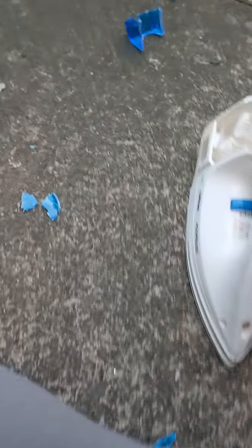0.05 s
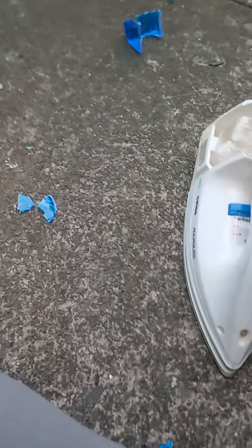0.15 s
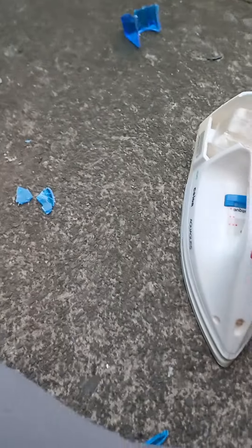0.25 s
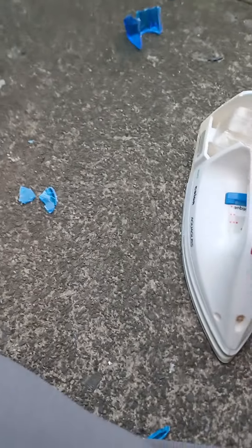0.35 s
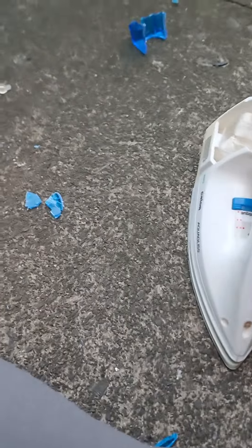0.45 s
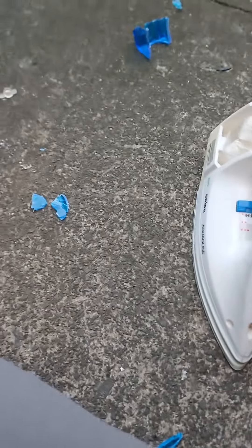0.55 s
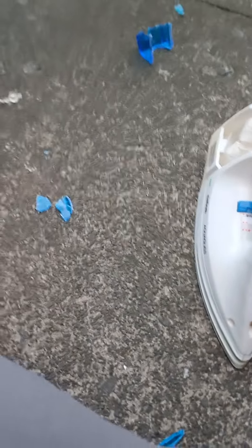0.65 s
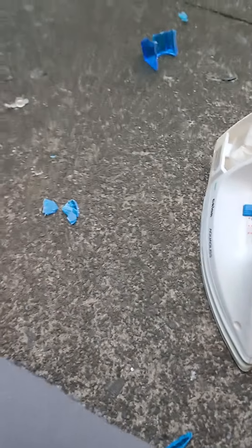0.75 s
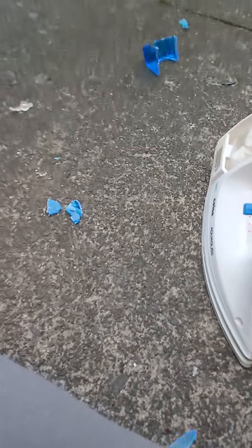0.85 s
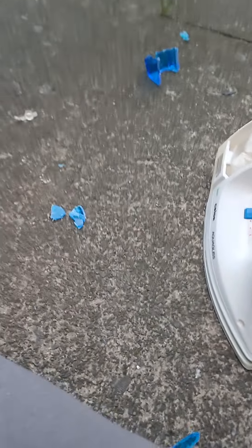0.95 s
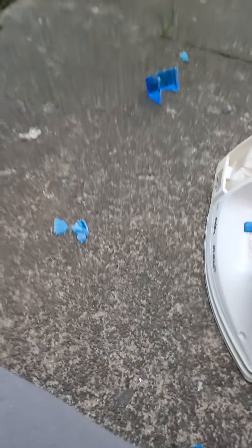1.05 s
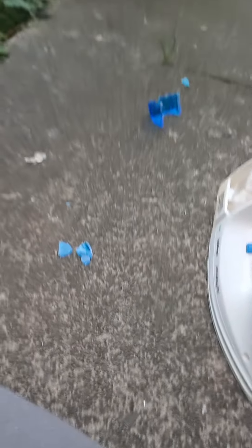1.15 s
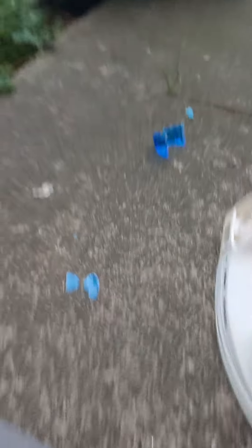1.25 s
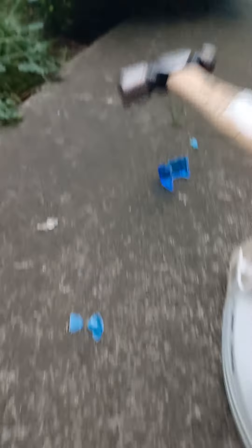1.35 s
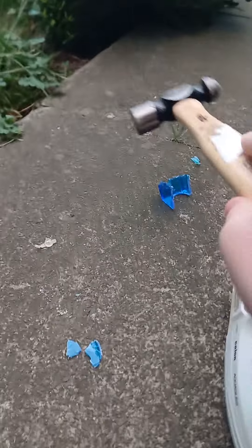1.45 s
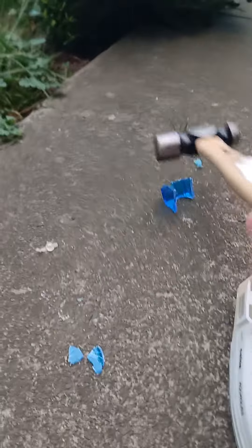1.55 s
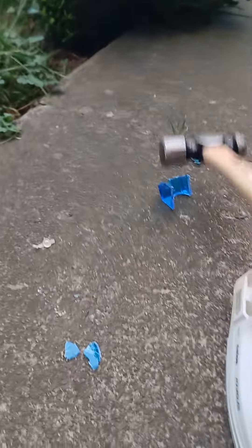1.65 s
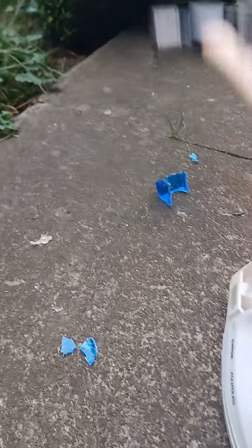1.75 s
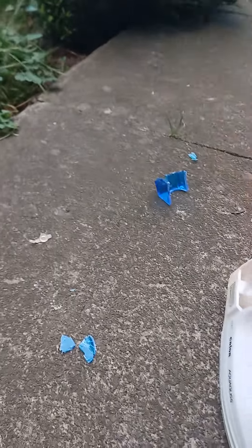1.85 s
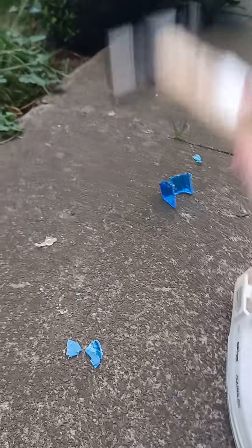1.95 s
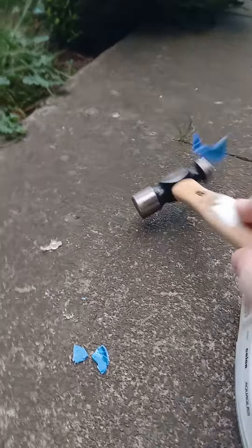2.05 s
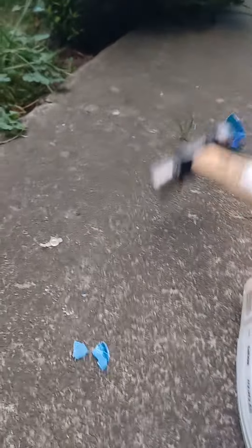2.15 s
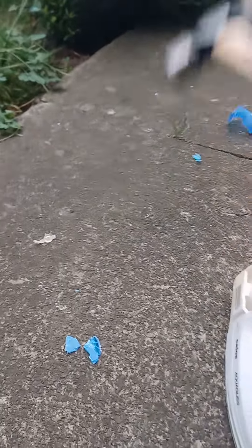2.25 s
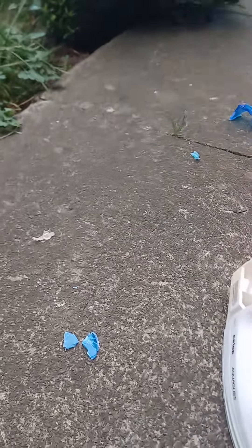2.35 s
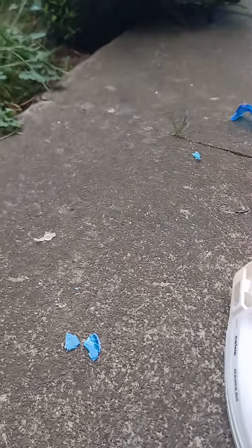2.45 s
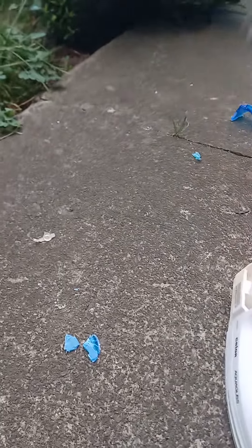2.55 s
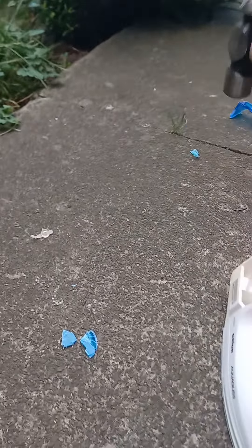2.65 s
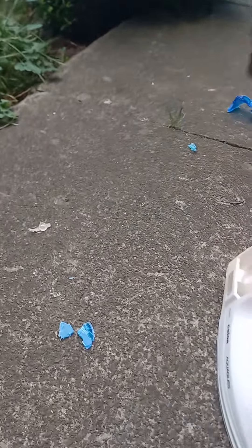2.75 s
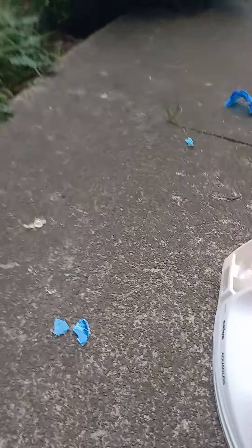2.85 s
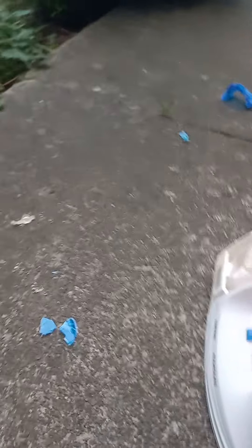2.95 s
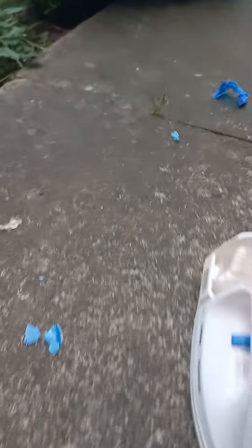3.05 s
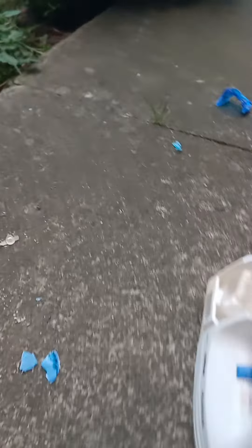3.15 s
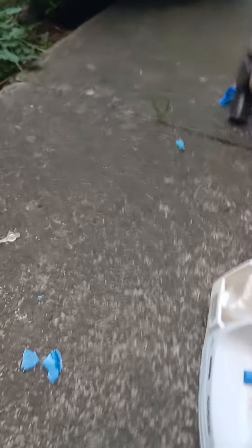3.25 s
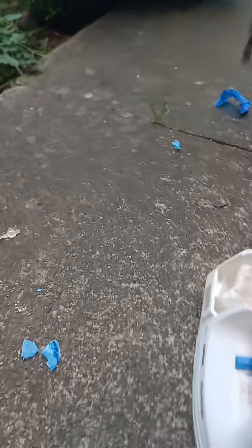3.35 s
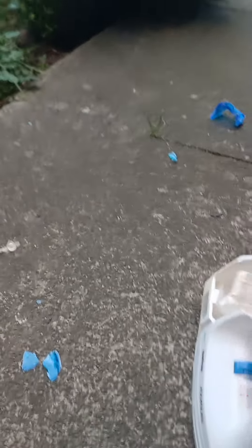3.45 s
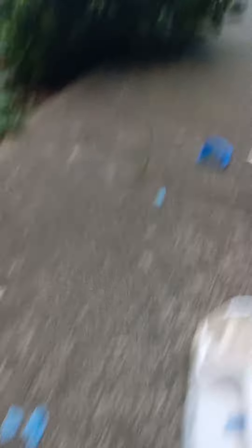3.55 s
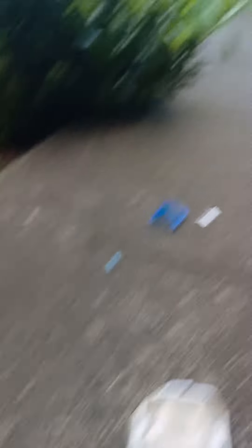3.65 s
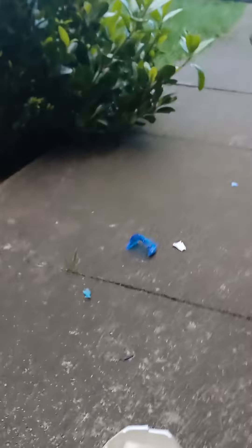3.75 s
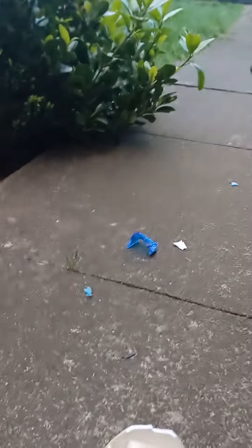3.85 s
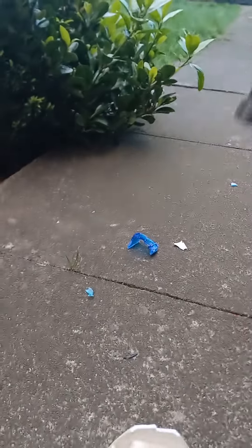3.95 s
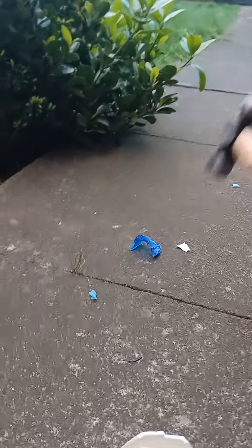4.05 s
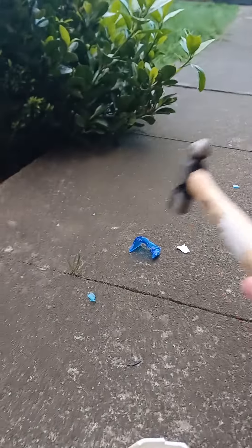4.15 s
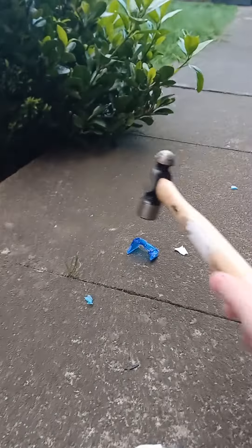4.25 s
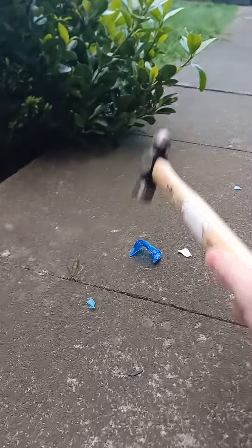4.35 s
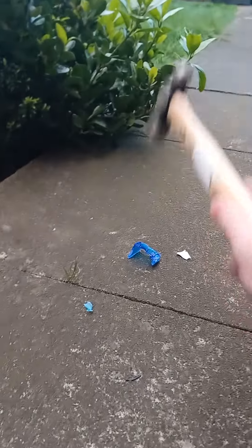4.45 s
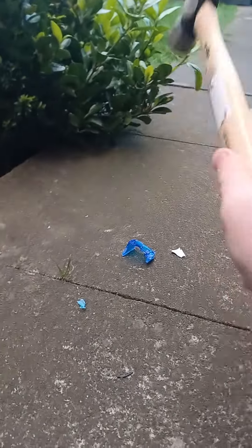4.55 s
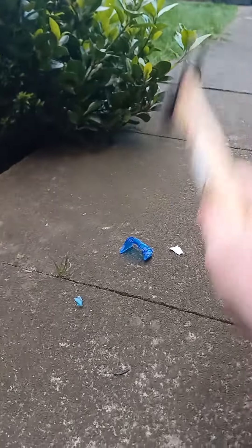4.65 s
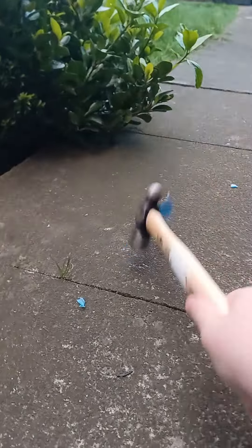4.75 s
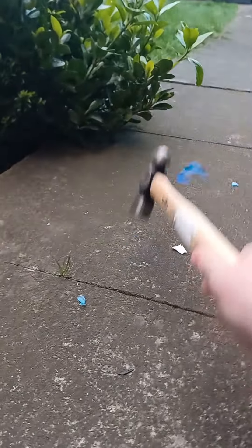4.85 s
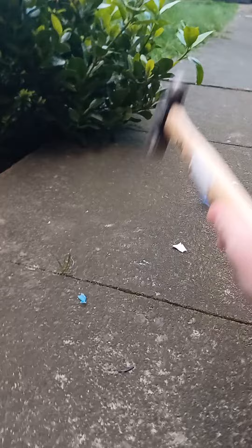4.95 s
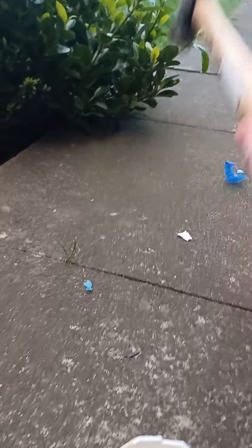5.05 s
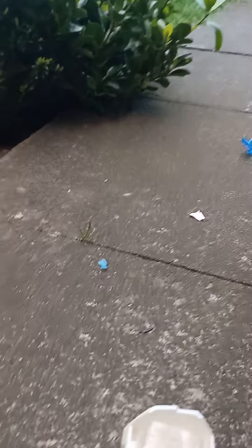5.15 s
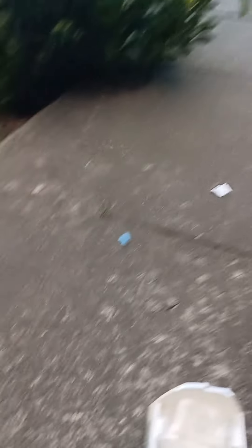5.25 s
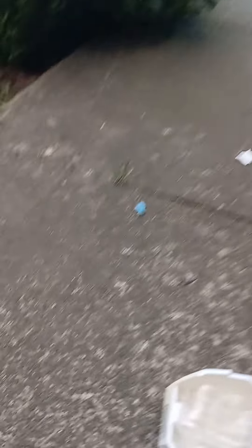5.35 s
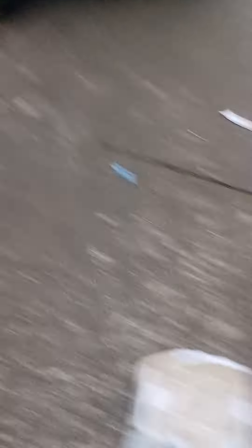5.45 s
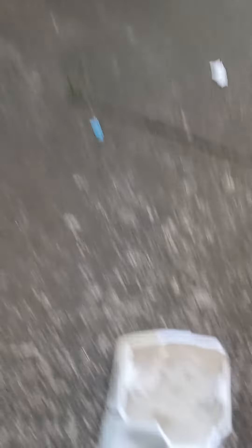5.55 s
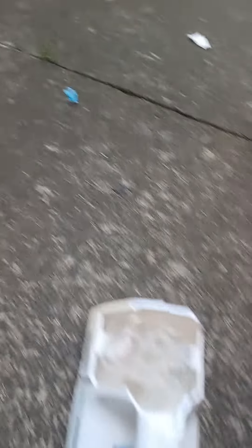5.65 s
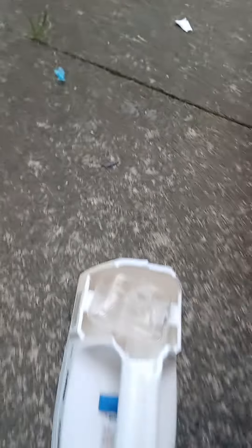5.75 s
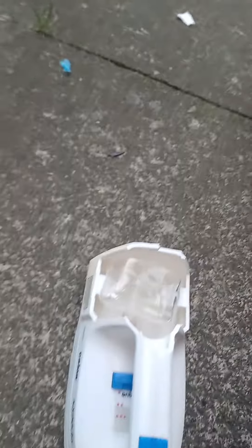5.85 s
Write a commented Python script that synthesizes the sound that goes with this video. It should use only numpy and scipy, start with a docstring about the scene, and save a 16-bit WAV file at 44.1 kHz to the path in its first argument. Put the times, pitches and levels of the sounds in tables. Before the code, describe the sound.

A steel hammer hits brittle plastic on concrete, five separated strikes in about six seconds, heard close by a phone outdoors. The first is a quick muffled crackle, the later ones louder and sharper. Pieces skip and rattle in bright, thin ticks between them. There is a short fluttering slap from nearby walls, a little cloth swish, and a faint far-off town rumble.

```python
"""A hammer smashes a small hard plastic toy on a concrete path beside a house, close to a hand-held phone.
Cracks are short bursts of uneven noise; the steel head, the toy and a shard ring as sets of fading tones.
Each blow also pushes out a low wave, and the walls return echoes, a soft tail and a low flutter.
Between the swings, shaped noise makes a sleeve swish and a shoe scuff.
The far town is a noise rumble with tyre wash at a level set over time, and one wavering drone swells in it."""
import sys
import numpy as np
from scipy import signal
from scipy.fft import rfft, irfft
from scipy.io import wavfile
from scipy.ndimage import uniform_filter1d

SR = 44100
rng = np.random.default_rng(int(sys.argv[2]) if len(sys.argv) > 2 else 0)


def output_pcm(signal):
    """Save a mono or channel-first signal as 16-bit PCM at the path in sys.argv[1].

    Samples are clipped to [-1, 1] before scaling.
    """
    pcm = np.clip(np.atleast_2d(signal).T, -1, 1) * 32767
    wavfile.write(sys.argv[1], SR, np.round(pcm).astype(np.int16))


N = 260190
TIME = np.arange(N) / SR  # seconds


def amp(db):
    """Turn decibels into a plain multiplier."""
    return 10 ** (np.asarray(db) / 20)


def curve(rows, column=1):
    """A table column joined by straight lines in time."""
    rows = np.array(rows)
    return np.interp(TIME, rows[:, 0], rows[:, column])


def unit(x):
    """Scale a sound to an average (RMS) level of 1."""
    return x / np.sqrt(np.mean(x ** 2))


def colour(x, points):
    """Make some pitches stronger and others weaker, following (f/Hz, level/dB) points."""
    hz, db = np.transpose(points)
    bins_hz = np.fft.rfftfreq(x.shape[-1], 1 / SR) + 1  # the 1 avoids the log of zero
    gains = amp(np.interp(np.log(bins_hz), np.log(hz), db))
    return irfft(rfft(x) * gains, x.shape[-1])


def cut(x, hz, kind="low", order=2):
    """Butterworth filter: keep what lies below hz ("low"), above it ("high") or between two ("band")."""
    sections = signal.butter(order, hz, kind, fs=SR, output="sos")
    return signal.sosfilt(sections, x)


def stereo_noise(size, width):
    """Noise at two microphones; width 0 is alike, 1 unrelated."""
    mid, side = rng.standard_normal((2, size))
    return np.array([mid + width * side, mid - width * side]) / np.sqrt(1 + width ** 2)


def pan_gains(pan_db):
    """Left and right multipliers that differ by pan_db (left minus right)."""
    return amp(np.array([[pan_db], [-pan_db]]) / 2)


def add(out, s, sound, pan_db):
    """Mix a stereo sound in at s seconds, towards one side."""
    start = int(s * SR)
    part = sound[:, :N - start] * pan_gains(pan_db)
    out[:, start:start + part.shape[1]] += part


def swell(s, hold_s, rise_s, release_s):
    """A rise that ends at s, a hold and a release, with rounded corners."""
    before = np.maximum(s - TIME, 0) / rise_s
    after = np.maximum(TIME - s - hold_s, 0) / release_s
    return 1 / np.cosh(np.minimum(2 * (before + after), 20))


def ring(modes, gains_db, scatter_db, apart_hz):
    """A struck body's fading tones, freshly weighted; short waves reach the two microphones out of step."""
    hz, db, t60 = np.transpose(modes)[:, :, None]
    t = TIME[:SR // 2]
    scatter = scatter_db * rng.standard_normal((2, len(hz), 1))
    size = amp(db + np.reshape(gains_db, (-1, 1)) + scatter)
    phase = np.minimum(hz / apart_hz, 1) * np.pi / 4 * rng.choice([-1, 1], hz.shape)
    # complex waves carry pitch and fade together; the imaginary part is what sounds
    waves = np.exp((2j * np.pi * hz - np.log(1000) / t60) * t)
    weights = size * np.exp(1j * np.array([phase, -phase]))
    return (weights[:, :, 0] @ waves).imag


def favour(modes, hz, boost_db, octaves):
    """The point of contact drives the modes near one pitch hardest (dB per mode)."""
    distance = np.log2(np.array(modes)[:, 0] / hz) / octaves
    return boost_db * np.exp(-distance ** 2)


# basic tone of a fracture, before its treble tilt: f/Hz, level/dB
FRACTURE_COLOUR = [(40, -29.5), (170, 2.5), (500, -2.5), (1000, 0), (1600, 3), (2700, -2.5), (4600, 0.5),
                   (7500, -6.5), (9500, -7.5), (13000, -5), (15500, -3.5)]


def snap(length, tilt_db, spread_db=8.0, fade_s=0.003):
    """A burst of tiny fractures, uneven in size, dying quickly in the plastic."""
    lead = 128  # silent samples at the start, trimmed off after the colouring
    t = TIME[:4096] - lead / SR
    grains = amp(spread_db * np.repeat(rng.standard_normal(256), 16))  # a new size every 16 samples
    fade = np.exp(-np.maximum(t - length, 0) / fade_s)
    noise = stereo_noise(len(t), 1) * (t > 0) * fade * grains
    # the tilt is in dB per octave and turns around 4000 Hz
    tilted = [(hz, db + tilt_db * np.log2(hz / 4000)) for hz, db in FRACTURE_COLOUR]
    burst = colour(noise, tilted)[:, lead:3072]
    # even out the energy so that long and short bursts are comparably strong
    return burst / np.sqrt(np.sum(burst ** 2) / (2 * SR * (length + fade_s / 2)))


def tick(peak_hz, q=1.4, tilt_db=-0.5):
    """The click of a hard edge on concrete, brightest around one pitch."""
    click = np.zeros((2, SR // 2))
    add(click, 0, cut(snap(0.00091, tilt_db, fade_s=0.0015), 1900, "high"), 0)
    return signal.lfilter(*signal.iirpeak(peak_hz, q, fs=SR), click)


# tone of the background noise: f/Hz, level/dB
BACKGROUND_COLOUR = [(15, -54.5), (25, -22.5), (35, -26), (48, 0.5), (114, 2), (177, -5.5), (260, -1.5),
                     (364, -10.5), (475, -17), (523, -19.5), (1000, -15.5), (2070, -30.5), (2510, -46.5),
                     (5440, -64), (8000, -58.5), (10400, -86.5), (17600, -120)]
# background level over time, dipping after the first blow as the phone turns itself down;
# before the trims below: t/s, rumble level/dB, tyre noise level/dB
BACKGROUND_LEVELS = [(0.0, -53.5, -61), (0.76, -59.5, -64.5), (2.0, -50.5, -53.5), (2.46, -52, -57),
                     (3.27, -44.5, -51), (4.01, -54.5, -56.5), (5.65, -52, -53), (5.9, -50, -49.5)]


def town(rumble_trim_db=3.0, tyres_trim_db=-3.0, split_hz=500, pan_db=-3):
    """The distant town: noise split into a low rumble and a higher wash of tyres, joined by a drone."""
    air = colour(stereo_noise(N, 0.5), BACKGROUND_COLOUR)
    rumble_level = amp(curve(BACKGROUND_LEVELS) + rumble_trim_db)
    tyres_level = amp(curve(BACKGROUND_LEVELS, column=2) + tyres_trim_db)
    rumble = unit(cut(air, split_hz, order=4)) * rumble_level
    tyres = unit(cut(air, split_hz, "high", order=4)) * tyres_level
    return (rumble + tyres + drone()) * pan_gains(pan_db)


# tone of cloth rubbing: f/Hz, level/dB
CLOTH_COLOUR = [(500, -10), (1500, 10.5), (4500, 3), (7000, -1.5), (9500, -9), (12500, 1.5), (16000, -6)]
# the sleeve slides as the arm moves: t/s at full speed, hold/s, level/dB at full speed, rise/s
ARM_MOVES = [(0.017, .04, -71.5, 0.062), (0.38, 0.38, -60, 0.19), (1.31, .19, -56.5, 0.062),
             (2.484, 1, -72.5, 0.129), (2.728, 0.11, -59, 0.078), (3.055, 0.056, -56.5, 0.11),
             (3.53, 0.19, -52.5, 0.012), (4.253, 0.15, -75.5, 0.1), (4.514, 0.032, -68, .06),
             (5.454, 0.47, -66, 0.091)]


def sleeve(flutter_db=1.0, rest_db=-82.5, sag_db=7, release_s=0.043, release_share=0.1):
    """Smooth fabric slides with each move of the arm, fading as the arm slows; a gentle move ends gently."""
    smoothed = uniform_filter1d(rng.standard_normal(N), SR // 60)
    unevenness = unit(uniform_filter1d(smoothed, SR // 60))
    sliding = amp(rest_db)
    for s, hold_s, db, rise_s in ARM_MOVES:
        slowing_db = sag_db * np.clip((TIME - s) / hold_s, 0, 1)
        # a slower rise also gives a longer release
        move = swell(s, hold_s, rise_s, release_s + release_share * rise_s)
        sliding = sliding + amp(db - slowing_db) * move
    cloth = unit(colour(stereo_noise(N, 1.0), CLOTH_COLOUR))
    return cloth * sliding * amp(flutter_db * unevenness)


# plastic fractures: t/s, length/s before the fade, level/dB, treble tilt/dB per octave, left minus right/dB
FRACTURES = [(0.1514, 0.0055, -19, -2, -11.5), (0.1525, 0.014, -15.5, 5.5, 19.5),
             (0.174, 0.009, -44, 8, 52), (0.19, 0.01, -22.5, 5, -1), (2.012, 0.00073, -11.5, 5.5, 4.5),
             (3.264, 0.0021, -18, -9, -2.5), (4.7291, 0.01, -20, -2, 1), (4.7366, .001, -12.5, -2, -2.5),
             (5.691, 0.0022, -35, 3, 7), (5.6932, 0.0022, -9, 3.8, 4), (5.71, 0.0023, -18.5, 13, 13),
             (5.734, 0.0021, -27.5, -3.5, 1)]


def cracks():
    """The plastic splits under the head in short bursts of noise."""
    out = np.zeros((2, N))
    for s, length, db, tilt_db, pan_db in FRACTURES:
        add(out, s, amp(db) * snap(length, tilt_db), pan_db)
    return out


def contact(x, hz, q):
    """A springy contact passes the lows, rings at its own pitch and loses the treble."""
    w = 2 * SR * np.tan(np.pi * hz / SR)  # places the pitch correctly in the digital filter
    b, a = signal.bilinear([w * w], [1, w / q, w * w], SR)
    return signal.lfilter(b, a, x)


# tones of the hammer's knock: f/Hz, level/dB, time to fade by 60 dB/s
HAMMER_MODES = [(152.4, -17.5, 0.023), (243, -22, 0.0072), (370, -13.5, 0.018), (691.4, -19, 0.064),
                (850, -2.5, 0.0077), (1281, -3, 0.023), (1500, -17.5, 0.016), (1842, -10.5, 0.0046),
                (2670, -21.5, 0.0066), (3260, -6, 0.011), (5370, -17, 0.013), (10920, -4, 0.058),
                (12480, -5, .035)]
# steel head meets the slab: t/s, knock level/dB, contact resonance f/Hz (low when plastic cushions it),
# left minus right/dB, thump f/Hz, thump level/dB
HAMMER_BLOWS = [(0.152, -21, 1500, 3.5, 235, -23.5), (0.1614, -17, 498.4, 14.5, 57.3, -34.5),
                (2.0142, -0.5, 722, -0.5, 854, -4.5), (2.0297, -14.5, 978, -4.5, 263, -22.5),
                (3.2653, -3.5, 4020, 1, 283, -14.5), (4.7371, -1.5, 1700, 0.5, 350, -17.5),
                (5.6965, -21.5, 4600, -4, 84.7, -30), (5.73, -19.5, 640, -2, 356, -27)]


def hammer(q=1.1, grit_db=-13, low_cut_hz=70):
    """The head and handle knock on the slab and crush its grit; a cushioned blow is duller."""
    out = np.zeros((2, N))
    modes = np.array(HAMMER_MODES)
    # each group of three modes swings against its neighbours
    signs = (-1) ** (np.arange(len(modes)) // 3)
    for s, db, contact_hz, pan_db, _, _ in HAMMER_BLOWS:
        knock = np.zeros((2, SR // 2))
        for sign in (-1, 1):
            knock += sign * ring(modes[signs == sign], 0, scatter_db=4.0, apart_hz=2370)
        grit = amp(grit_db) * snap(0.0046, 0.0)
        add(knock, 0, grit, 0)
        add(out, s, amp(db) * contact(knock, contact_hz, q), pan_db)
    return cut(out, low_cut_hz, "high", order=3)


def thumps(cycles=2.8, low_cut_hz=35):
    """Each blow shoves the air: a wave that is gone in a few cycles."""
    out, t = np.zeros((2, N)), TIME[:SR // 4]
    for s, _, _, pan_db, hz, db in HAMMER_BLOWS:
        wave = np.sin(2 * np.pi * hz * t) * np.exp(-hz * t / cycles)
        add(out, s, amp(db) * wave * np.ones((2, 1)), pan_db)
    return cut(out, low_cut_hz, "high")


# tones of the toy, its two lowest bends first: f/Hz, level/dB, time to fade by 60 dB/s
TOY_MODES = [(1482, -7, 0.38), (2065, -16, 0.09), (3600, -4.5, 0.11), (5400, -6.5, 0.094),
             (7553, -26, 0.033), (8290, -6, .07), (8807, -12, 0.028), (9550, -9, .06), (10850, -3.5, 0.072),
             (12560, -11, 0.023), (13405, -5.5, 0.11), (15100, -7, .05), (14800, -12, .06)]
# the toy is struck or lands: t/s, level/dB of the whole hit, boost of the two lowest bends/dB,
# favoured f/Hz, tick level/dB within the hit, left minus right/dB
TOY_LANDINGS = [(.154, -41.5, -24, 3600, -15, -24), (2.0135, -25, -5, 15100, -7.5, 10.5),
                (2.1746, -40, 12.5, 3600, 13, 5.5), (2.181, -42.5, -24, 5400, 16.5, 6.5),
                (2.235, -56.5, 16, 3600, 15, 6.5), (2.2778, -59, 12, 5400, 16, 7.5),
                (2.297, -50.5, 7, 13400, -3, 10), (2.360, -66.5, 4.5, 5400, 14, 17),
                (4.731, -29.5, -25, 10850, -26, 3.5), (4.981, -34.5, 1.5, 3600, 16, -6),
                (4.9828, -29, -15, 10850, 12, -1), (5.073, -50.5, 15.5, 3600, 9, -8.5),
                (5.088, -31, -10.5, 5400, 5.5, -5), (5.166, -53, -4.5, 15300, 19.5, 1),
                (5.1675, -48.5, 11, 8290, 10, -11), (5.197, -44, -3.5, 14800, 9, 0),
                (5.357, -68, 23.5, 3600, -8, -5), (5.4115, -52, 0.5, 10850, 5.5, 4),
                (5.4356, -42, 4, 7600, -6, -9), (5.5005, -60.5, 7, 9640, 5, 9),
                (5.695, -27, -15, 13400, -20, -1.5), (5.754, -47, 18, 5400, 10.5, -6.5),
                (5.818, -41, 9, 3600, 2, -3)]


def toy(ring_trim_db=-5.0):
    """Each hit ticks and rings the toy: a corner excites high modes, a flat side its lowest bends."""
    out = np.zeros((2, N))
    bends = np.arange(len(TOY_MODES)) < 2
    for s, db, bend_db, favoured_hz, tick_db, pan_db in TOY_LANDINGS:
        near_db = favour(TOY_MODES, favoured_hz, boost_db=14.5, octaves=0.07)
        ringing = ring(TOY_MODES, bend_db * bends + near_db + ring_trim_db, scatter_db=6.5, apart_hz=3000)
        hit = ringing + amp(tick_db) * tick(favoured_hz)
        add(out, s, amp(db) * hit, pan_db)
    return out


# soft tail of the yard: f/Hz, level/dB, time to fade by 60 dB/s
YARD_TAIL = [(60, -4.5, 0.26), (261.2, -6.5, 0.35), (600, -7.5, 0.12), (1100, -23.5, 0.39),
             (2200, -15, 0.43), (5000, -12, .42), (9000, -10.5, 0.23), (15000, -19.5, .28)]
# separate echoes: delay t/s, level/dB, treble cut-off f/Hz
WALL_ECHOES = [(0.0144, -25, 1843), (0.0404, -18.5, 900)]


def yard(dry, build_s=0.015):
    """Wall echoes and a diffuse tail from paving and bushes, each pitch band fading at its own rate."""
    t = TIME[:SR * 3 // 4]
    hz, db, t60 = np.transpose(YARD_TAIL)
    bins = np.log(np.fft.rfftfreq(len(t), 1 / SR) + 1)
    response = np.zeros((2, len(t)))
    # each row of the identity matrix picks one band, which overlaps its neighbours
    for k, share in enumerate(np.eye(len(hz))):
        noise = stereo_noise(len(t), min(.5 + hz[k] / 3000, 1))  # low sound is more alike on both sides
        band = irfft(rfft(noise) * np.sqrt(np.interp(bins, np.log(hz), share)), len(t))
        fade = np.exp(-np.log(1000) * t / t60[k]) * (1 - np.exp(-t / build_s))
        response += amp(db[k]) * band * fade / np.linalg.norm(fade)
    out = signal.fftconvolve(dry, response, axes=1)[:, :N]
    for delay, echo_db, top_hz in WALL_ECHOES:
        add(out, delay, amp(echo_db) * cut(dry, top_hz), 0)
    return out


def flutter(dry, db=-7, t60=0.75, uneven_db=4.0, trip_s=.0198, band_hz=(190, 420)):
    """Low sound shuttles between two facing walls; its evenly timed returns build a row of standing waves."""
    trips = trip_s * np.arange(1, 30)
    # rough walls return each round trip a little stronger or weaker
    sizes = amp(db + uneven_db * rng.standard_normal(len(trips)))
    response = np.zeros((1, SR))
    response[0, (trips * SR).astype(int)] = sizes * np.exp(-np.log(1000) * trips / t60)
    lows = cut(dry, band_hz, "band", order=3)
    return signal.fftconvolve(lows, response, axes=1)[:, :N]


# tones of the shard: f/Hz, level/dB, time to fade by 60 dB/s
SHARD_MODES = [(1950, -15, 0.15), (3530, -8, 0.065), (4257, -6.5, 0.15), (4470, -6, 0.1), (4890, 0.5, 0.07),
               (6850, -6, 0.083), (7500, -3, 0.05), (8700, -4, 0.023), (10700, -4.5, 0.072),
               (11460, -5.5, 0.065), (13400, -2.5, 0.053), (13555, -20, .05), (15000, -3, 0.05),
               (15445, -15, 0.035)]
# a shard skips over the slab: t/s, level/dB of the whole hit, favoured f/Hz, left minus right/dB
SHARD_SKIPS = [(.336, -41.5, 12400, 9), (0.3587, -43, 3600, 9), (.419, -60, 13000, 39),
               (0.421, -58, 8100, 23), (0.428, -42, 1950, 1), (0.468, -51, 15100, 12),
               (0.485, -47, 3940, 1), (0.499, -48.5, 13200, 8), (0.5759, -47, 13300, 7.5),
               (5.413, -48, 15200, -2)]


def shard(tick_db=4, other_modes_db=-5):
    """A broken-off piece clinks away, favouring a different pitch for each edge it lands on."""
    out = np.zeros((2, N))
    for s, db, favoured_hz, pan_db in SHARD_SKIPS:
        gains_db = other_modes_db + favour(SHARD_MODES, favoured_hz, boost_db=15.5, octaves=0.26)
        ringing = ring(SHARD_MODES, gains_db, scatter_db=3.0, apart_hz=3000)
        hit = ringing + amp(tick_db) * tick(favoured_hz)
        add(out, s, amp(db) * hit, pan_db)
    return out


def drone(hum_hz=116, s=1.2, hold_s=0.27, rise_s=0.38, release_s=0.23, db=-47):
    """A distant hum with a slowly wandering pitch swells once and goes."""
    waver = unit(cut(rng.standard_normal(N), 2.03))
    pitch_hz = hum_hz * (1 + 0.022 * waver)
    tone = np.sin(2 * np.pi * np.cumsum(pitch_hz) / SR)
    return amp(db) * swell(s, hold_s, rise_s, release_s) * tone


# a shoe shifts softly on the paving: t/s, resonance f/Hz, level/dB
SHOE_SCUFFS = [(2.601, 972, -55), (2.771, 850, -51), (3.019, 535, -54), (4.34, 1030, -59), (4.44, 516, -54)]


def scuffs(q=2.05, hold_s=0.051, rise_s=0.068, release_s=0.013):
    """A rubber sole rubs briefly: noise through a dull resonance."""
    out = np.zeros((2, N))
    for s, hz, db in SHOE_SCUFFS:
        sole = signal.iirpeak(hz, q, fs=SR)
        rub = stereo_noise(N, 0.85)
        for _ in range(2):  # two passes narrow the resonance
            rub = signal.lfilter(*sole, rub)
        out += amp(db) * swell(s, hold_s, rise_s, release_s) * unit(rub)
    return out


def scene(pieces_echo_db=-4, knock_flutter_db=-9):
    """The blows and bounces, their echoes, and the quiet around them."""
    blows = hammer() + cracks()
    pieces = toy() + shard()
    push = thumps()
    # pieces lying on the ground send less sound to the walls
    echoes = yard(blows + amp(pieces_echo_db) * pieces)
    # it is mostly the low push that shuttles between the walls
    echoes += flutter(push + amp(knock_flutter_db) * blows)
    return blows + pieces + push + echoes + sleeve() + scuffs() + town()


def record(dry, ceiling=.8, top_hz=15900):
    """The phone rounds the loudest peaks towards a ceiling and cuts the top of the treble."""
    rounded = ceiling * np.tanh(dry / ceiling)
    # steep low-pass: 0.2 dB ripple below the edge, 70 dB down above it
    low_pass = signal.ellip(8, .2, 70, top_hz, fs=SR, output="sos")
    return signal.sosfilt(low_pass, rounded)


dry = scene()
out = record(dry)
output_pcm(out)
```